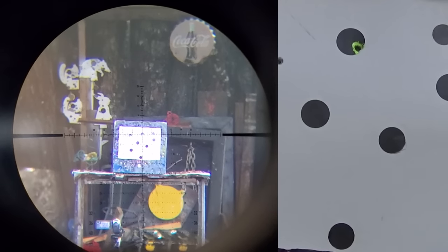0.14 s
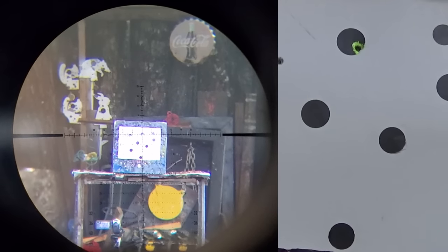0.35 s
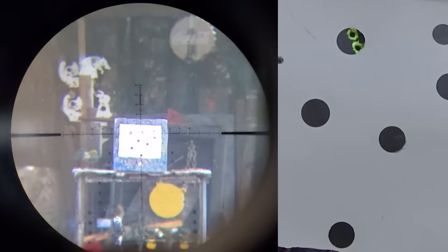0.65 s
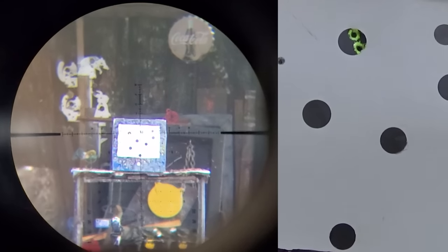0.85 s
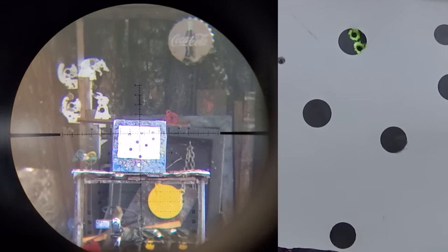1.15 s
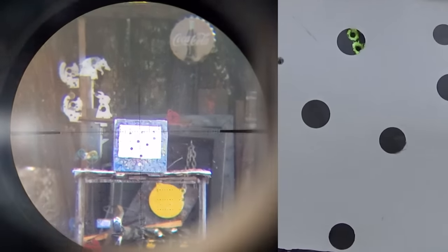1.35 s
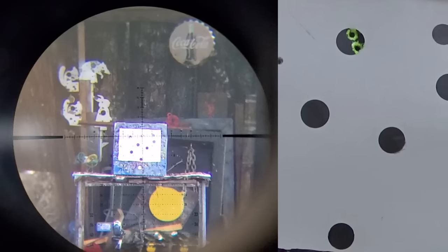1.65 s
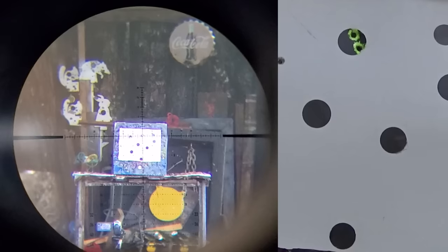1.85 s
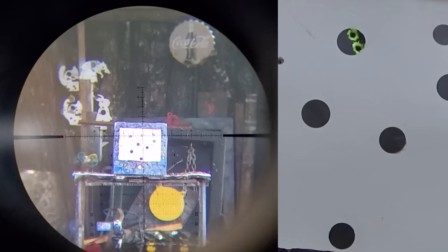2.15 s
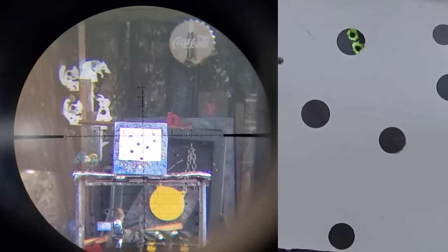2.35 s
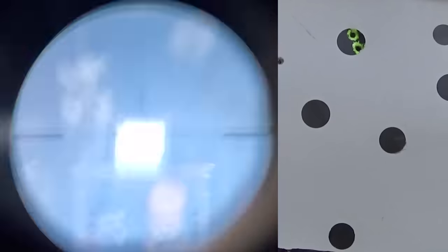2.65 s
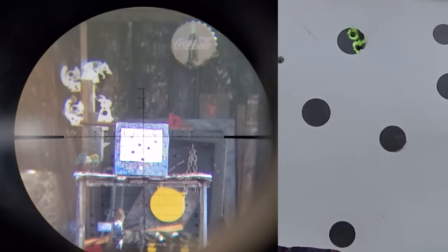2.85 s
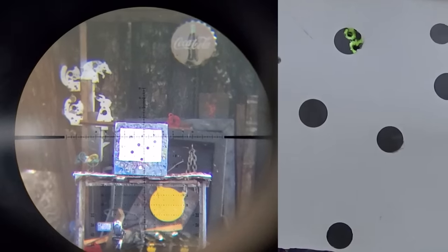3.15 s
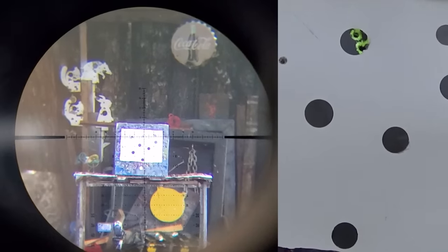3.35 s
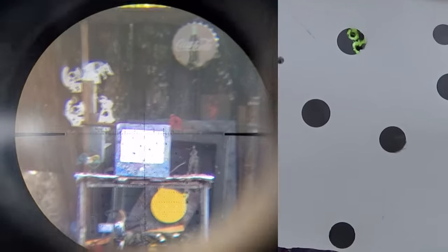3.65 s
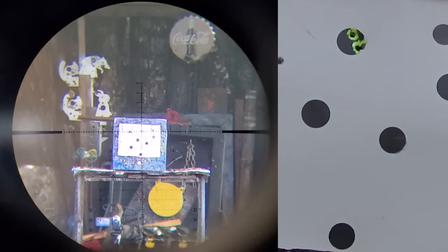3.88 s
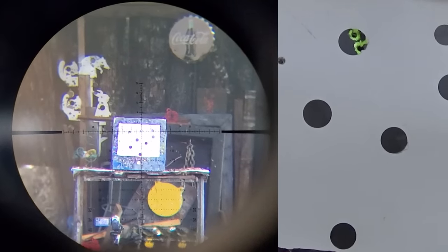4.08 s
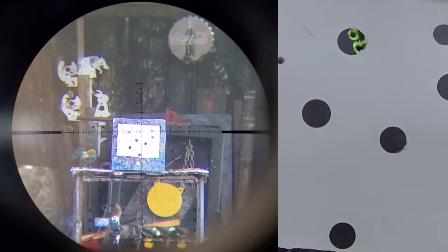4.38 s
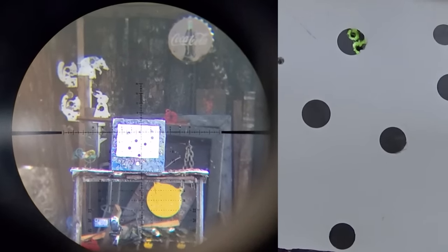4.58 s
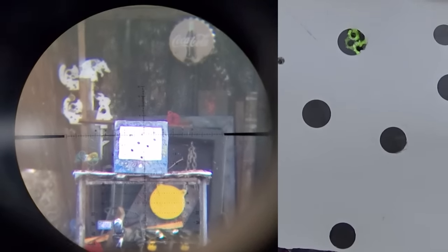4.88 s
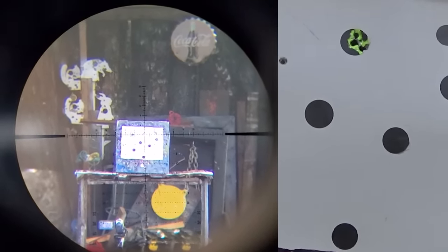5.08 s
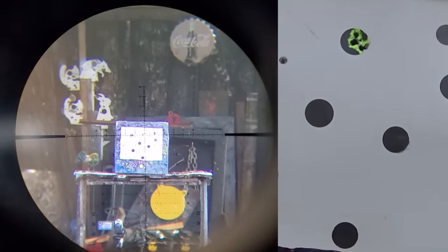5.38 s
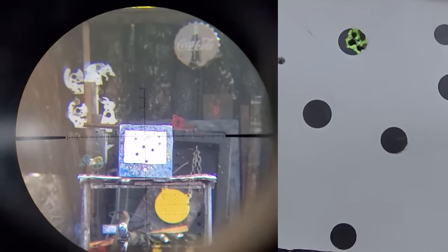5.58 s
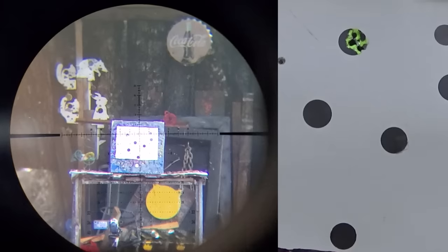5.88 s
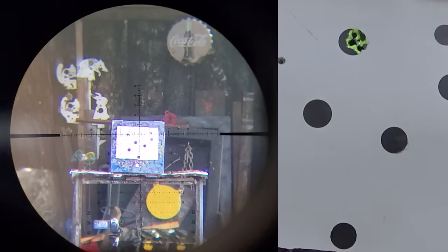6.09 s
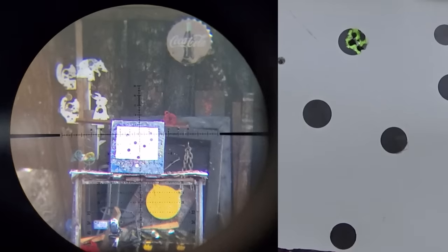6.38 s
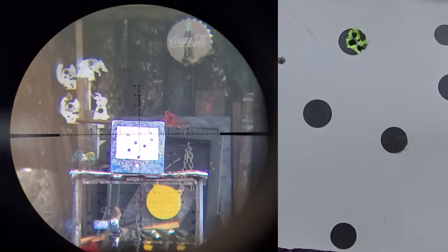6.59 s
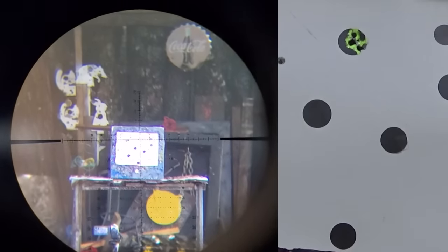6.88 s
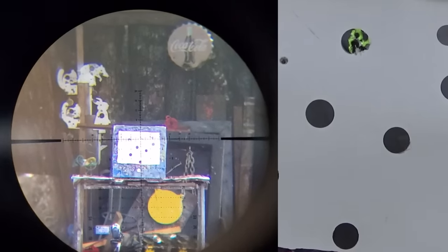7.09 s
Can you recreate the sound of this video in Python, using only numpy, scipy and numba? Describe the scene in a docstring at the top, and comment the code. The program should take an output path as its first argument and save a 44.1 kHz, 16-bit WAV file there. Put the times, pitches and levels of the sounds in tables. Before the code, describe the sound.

Four air rifle shots, heard from microphones at both the gun and the target trap. A low woody thump and breathy airy rush come first, a dry crack follows a moment later, then the pellet smashes into the trap and the yard rings with a hissy, grainy tail. Between shots are faint trigger clicks, rubbing of the stock, a tiny metal ping and soft outdoor rumble, with quiet bird chirps late on.

```python
"""An outdoor yard with a pellet trap: an air rifle fires about every two seconds, miked at the rifle and at the trap.
The rifle pair gets a hammer-and-air noise burst over decaying sine modes of stock, bottle and barrel.
The trap pair gets the ringing muzzle crack amid short noise bursts, then the pellet's smash and yard echo as
shaped noise, through a limiter. The echo of a shot before the start, handling noises, faint tones, a metal ping,
chirps of a bird and soft air lie under it."""
import sys
import numpy as np
from scipy import signal
from scipy.fft import rfft, irfft, next_fast_len
from scipy.io import wavfile
from scipy.ndimage import uniform_filter1d
from numba import njit

SR = 44100
rng = np.random.default_rng(int(sys.argv[2]) if len(sys.argv) > 2 else 0)


def persist_wave(psi):
    """Save psi, clipped to +-1, as 16-bit WAV."""
    counts = np.round(np.clip(psi, -1, 1) * 32767).astype(np.int16)
    wavfile.write(sys.argv[1], SR, np.atleast_2d(counts).T)


N = 318843  # length [samples]
DROP = np.log(1000)  # a 60 dB fall, as an exponent

# shots: (crack reaches trap [s], pellet hits [s], rifle [dB], body thump [dB], blow [dB], knock [dB])
SHOTS = [(-1.179, -1.07, -14, 0, -8, 0), (.5711, .680, -14, 0, -17.5, 8),
         (2.7796, 2.887, -13, -2, -12.5, 3), (4.8244, 4.931, -14, 0, -8.5, 0),
         (6.8528, 6.963, -14, -1, -7.5, -2)]
TRAP_M, SOUND_M_S = 46.5, 343  # rifle to trap [m], speed of sound [m/s]

# rush of hammer and air: (frequency [Hz], density [dB per Hz])
ACTION_COLOUR = [(60, -6), (130, 0), (400, -3), (750, 0), (1300, -6), (3000, -8), (6000, -9), (8300, -10),
                 (9100, -20), (10500, -12), (16000, -14)]
# how long the rush lasts: (frequency [Hz], t60 [s])
ACTION_T60 = [(200, .2), (800, .2), (3000, .3), (10000, .3)]
# resonances of the action: (frequency [Hz], width [Hz], boost [dB])
ACTION_BANDS = [(750, 250, 5), (2050, 200, 6), (2950, 250, 6), (3800, 300, 6), (5800, 400, 5),
                (8000, 700, 5)]
ACTION_RISE_S, ACTION_DB, ACTION_PAN_DB, VALVE_DB = .009, -9.5, -3, -4
# stock and bottle modes: (frequency [Hz], level [dB], left minus right [dB], right lag [turns],
# delay [s], swell [s], t60 [s])
BODY_MODES = [(35, -5, -4, .4, .01, .03, .25), (60, -5, -4, .35, .01, .03, .3),
              (88, -8, -3, .3, .02, .03, .3), (125, -8, -3, .4, .005, .01, .15),
              (165, -9, -5, .3, .005, .01, .15), (213, 27, -9, .2, .011, .06, .075),
              (255, 1, -6, .3, .004, .012, .1), (325, -9, -4, .3, 0, .006, .1),
              (215, -19, -9, .2, .02, .02, .3), (655, -7, -4, .3, 0, .004, .08),
              (780, -5, -4, .3, 0, .004, .06), (1001, -21, -6, .3, 0, .005, .5),
              (1222, -29, -4, .3, 0, .005, .8)]
# modes of thin steel parts: (frequency [Hz], level [dB], t60 [s])
BARREL_MODES = [(1437, -21, .16), (2012, -19, .2), (2440, -21, .18), (2765, -22, .22), (2970, -19, .17),
                (3695, -19, .2), (4150, -21, .22)]
BODY_TOP_HZ, RATTLE_DB = 400, 3.0  # modes below this make the thump; depth of every mode's waver
HAMMER_LEAD_S = .006  # the body is struck by the hammer just before the burst

# ring of the muzzle crack: (frequency [Hz], level [dB], t60 [s])
CRACK_MODES = [(2300, -2, .004), (2900, 2.5, .005), (3500, 5, .004), (4600, 3, .0035), (8200, -6, .003)]
# colour of the noise bursts around the crack: (frequency [Hz], density [dB per Hz])
REPORT_COLOUR = [(300, -20), (900, -17), (1500, -7), (2800, 0), (3600, -2), (5200, -7), (7400, -3),
                 (9700, -6), (12600, -15), (16000, -28)]
# noise bursts around the crack, two just before it and the rest after as returns off walls and ground:
# (offset [s], level [dB], t60 [s], resonance [Hz], resonance boost [dB])
REPORT_BURSTS = [(-.006, -19, .03, 3000, 0), (-.0028, -8, .008, 3600, 4), (.002, -13.5, .06, 2700, 4),
                 (.002, -23, 1.0, 3150, 6), (.013, -15, .04, 8000, 6), (.078, -12, .09, 2900, 11),
                 (.087, -14, .06, 11000, 12)]
# low knocks after the crack: (delay [s], frequency [Hz], level [dB], t60 [s])
THUDS = [(.002, 300, -22, .03), (.086, 220, -16, .025)]
REPORT_DB, HOLLOW_Q = -12, 7.  # report level at the trap; sharpness of the bursts' resonances

# colour of the pellet's smash: (frequency [Hz], density [dB per Hz])
SMASH_COLOUR = [(100, -40), (250, -23), (400, -28), (800, -15), (1400, -10.5), (2000, -8.5), (3000, -7),
                (6400, -6), (9300, -5), (11000, -10), (16000, -31)]
# resonances of the trap: (frequency [Hz], width [Hz], level [dB])
TRAP_MODES = [(1000, 80, 4), (1380, 50, 9), (1900, 60, 7), (2010, 50, 6), (4140, 60, 4), (4750, 90, 4),
              (6500, 200, 4), (7130, 60, 4)]
# colour of the knock of the trap's box: (frequency [Hz], density [dB per Hz])
KNOCK_COLOUR = [(150, -16), (300, -10), (480, -3), (700, -2), (1350, 1), (2000, -3), (3500, -30)]
# likeness of the trap pair's two sides: (frequency [Hz], likeness [0-1])
TRAP_LIKENESS = [(250, .94), (640, .8), (1400, .74), (3100, .68), (6800, .85), (15000, .93)]
# first returns of the impact: (delay [s], level [dB], t60 [s])
IMPACT_PATHS = [(.002, -2, .05), (.011, -1, .06), (.070, -4, .035), (.110, -16, .05)]
# decay of the yard's wash: (frequency [Hz], t60 [s])
YARD_T60 = [(200, 1.5), (450, .8), (800, 1.0), (1500, 1.1), (3700, .85), (7000, .65), (10000, .5),
            (15000, .33)]
# slaps off far walls: (delay [s], frequency [Hz], level re blow [dB], left minus right [dB])
SLAPS = [(.334, 1700, -13, -.5), (.416, 1800, -22, -2.5), (.622, 1950, -33, -1), (1.047, 1350, -39, -4)]
# colour of the late dull echo: (frequency [Hz], density [dB per Hz])
FAR_WOODS_COLOUR = [(300, -20), (700, -4), (1400, 0), (2200, -3), (4500, -14), (9000, -30)]
KNOCK_DB, KNOCK_T60_S = -11, .27
TRAP_RING_DB, TRAP_RING_T60_S, BLOW_RISE_S = -26, .6, .001
YARD_DB, GRAIN_DB, PATCH_DB = -7, 1.3, 1.6  # wash level, its graininess, its clumping in time and pitch
TRAP_IN_YARD = .75  # share of the trap's colour, in dB, kept in the echoes
FAR_DB, FAR_T60_S, TRAP_PAN_DB = -36, 3.0, -.8
LIMIT_DB, LIMIT_RATIO, LIMIT_ATTACK_S, LIMIT_RELEASE_S = -19, 6., .0016, .02

# short clicks, most of trigger parts and of hands on the rifle, two echoing off far walls: (time [s], level
# before pan [dB], frequency [Hz])
TICKS = [(1.1214, -41, 5500), (1.278, -44, 2200), (1.2915, -42, 1750), (1.3014, -47, 1600),
         (1.3783, -44, 1800), (3.5174, -45, 2500), (3.5523, -40, 2000), (3.5604, -42, 2200),
         (3.5927, -46, 2050), (3.6217, -50, 1880), (3.6681, -51, 2200), (5.6664, -44, 1860),
         (5.672, -46, 4500), (5.693, -43, 1420)]
TICK_T60_S, TICK_REACH, TICK_PAN_DB = .009, 2.2, -5.5  # reach: top of the click over its pitch
# grip shifts on the stock after a shot: (time [s], length [s], level before pan [dB])
GRIPS = [(1.316, .045, -52), (1.382, .025, -52), (3.596, .11, -56), (5.735, .06, -53)]
# what the rubbed stock passes on: (frequency [Hz], density [dB per Hz])
STOCK_COLOUR = [(115, -26), (230, 0), (320, -24), (900, -55)]
GRIP_JUDDER_DB, GRIP_PAN_DB, GRIP_T60_S = 2.5, -11.5, .05
SQUEAK_HZ, SQUEAK_DB, SQUEAK_LEAD_S, SQUEAK_S = 1460, -16, .005, .075  # lead: start before the rub ends
# faint rustles: (time [s], level [dB], frequency [Hz])
RUSTLES = [(1.64, -61, 1000), (2.475, -62, 700)]
RUSTLE_T60_S = .2
# soft low bumps: (time [s], level [dB], frequency [Hz], t60 [s])
BUMPS = [(.821, -27, 225, .04), (.945, -35, 250, .04)]
# a chip of metal lands: (frequency [Hz], level [dB], t60 [s])
PING_MODES = [(10150, -54, .12), (12200, -60, .01)]
PING_S = 3.401
# faint steady tones: (start [s], end [s], frequency [Hz], rms level [dB])
TONES = [(3.61, 3.79, 11300, -78), (-.1, .42, 172, -63), (2.3, 2.48, 380, -75)]
# bird: (time [s], level before pan [dB])
CHIRPS = [(6.197, -63), (6.255, -64), (6.33, -63), (6.42, -64)]
CHIRP_TOP_HZ, CHIRP_END_HZ, CHIRP_S, CHIRP_LOW_DB = 7600, 5300, .03, -15  # low: partial an octave down
# smear of the chirp by the leaves: (frequency [Hz], density [dB per Hz])
CHIRP_ECHO_COLOUR = [(4000, -25), (5300, -8), (6500, 0), (7400, 0), (8300, -25)]
CHIRP_ECHO_DB, CHIRP_ECHO_T60_S = 2.5, .65

# air common to both sides: (frequency [Hz], density [dB per Hz])
AIR_MID_COLOUR = [(12, -40), (25, -14), (50, -4), (85, 0), (125, -3), (200, -13), (400, -23), (1000, -25.5),
                  (2000, -31), (4000, -34), (8000, -36.5), (13000, -39), (16000, -45)]
# air opposed between the sides: (frequency [Hz], density [dB per Hz])
AIR_SIDE_COLOUR = [(12, -44), (20, -14), (77, 1), (163, -7), (210, -2), (923, -12), (1330, -17),
                   (2020, -18), (7950, -29), (16000, -51)]
AIR_DB, AIR_SIDE_DB = -59, -68
CLIP_DB, TOP_HZ = -9.5, 15900  # recorder's ceiling and treble cutoff


def undb(db):
    """Amplitude factor of a level in dB."""
    return 10 ** (np.asarray(db) / 20)


def read(table, hz):
    """Table value at a frequency, straight on a log axis."""
    table = np.array(table)
    return np.interp(np.log(hz), np.log(table[:, 0]), table[:, 1])


def add(out, s, x):
    """Mix x into out from time s, trimmed to the scene."""
    i = int(round(s * SR))
    a, b = max(i, 0), min(i + x.shape[-1], N)
    if b > a:
        out[:, a:b] += x[..., a - i:b - i]


def pan(db):
    """Left and right gains, db apart."""
    return undb(np.array([[db], [-db]]) / 2)


def walk(rate, size=N):
    """Random levels held 1 / rate s and slewed; spread near 1."""
    k = int(SR / rate)
    held = rng.standard_normal(size)[np.arange(size) // k]
    return 1.2 * uniform_filter1d(held, k)


def fade_by_pitch(both, t60, patch_db, size):
    """Decay in short frames, each band at its own rate, with random clumps of level."""
    hz, s, frames = signal.stft(both, SR, nperseg=256)
    clumps = rng.standard_normal(frames.shape[1:])
    clumps = uniform_filter1d(uniform_filter1d(clumps, size=3, axis=0), size=5, axis=1)
    frames = frames * undb(patch_db * clumps / clumps.std())
    frames = frames * np.exp(-DROP * s / read(t60, hz + 1)[:, None])
    return signal.istft(frames, SR, nperseg=256)[1][:, :size]


def wash(colour, t60, like, peaks=(), rise=.0002, size=0, patch_db=0.):
    """Coloured stereo noise, rms 1 with its peaks, before swell and decay; t60 and likeness are a value or a
    table."""
    hz = np.maximum(np.arange(size // 2 + 1) * SR / size, 1)
    gain = undb(read(colour, hz))
    for f, width, db in peaks:
        gain = gain * (1 + (undb(db) - 1) / (1 + (2 * (hz - f) / width) ** 2))
    like = np.clip(read(like, hz) if np.ndim(like) else like, 0, 1)
    mid, side = rfft(rng.standard_normal((2, size))) * gain / np.sqrt(np.mean(gain ** 2))
    shared, opposed = np.sqrt(1 + like) * mid, np.sqrt(1 - like) * side
    both = irfft(np.array([shared + opposed, shared - opposed]) / np.sqrt(2))
    t = np.arange(size) / SR
    if np.ndim(t60) == 0:
        both = both * np.exp(-DROP * t / t60)
    else:
        both = fade_by_pitch(both, t60, patch_db, size)
    return both * (1 - np.exp(-t / rise))


def ring(hz, t60, swell=.0003, lag=0.):
    """One decaying sine mode on both channels, with chance phase and a slightly new pitch."""
    t = np.arange(int(t60 * SR) + 64) / SR
    pitch = hz * (1 + .006 * rng.standard_normal())
    phase = pitch * t + rng.random() - np.array([[0], [lag]])  # [turns]
    envelope = (1 - np.exp(-t / swell)) ** 2 * np.exp(-DROP * t / t60)
    return np.sin(2 * np.pi * phase) * envelope


def tick(hz, t60, wide):
    """A short click with peak 1: noise gathered around one pitch."""
    colour = [(hz / 3, -30), (hz, 0), (hz * wide, -10), (hz * wide * 2, -40)]
    click = wash(colour, t60, .8, rise=.0006, size=1024)
    return click / np.abs(click).max()


def action(out, s, db):
    """Noise grows as the hammer rattles up to the valve, then air bursts out in a fluttering rush."""
    lead = 2048
    run_up = wash(ACTION_COLOUR, np.inf, 0., ACTION_BANDS, size=lead)
    run_up = run_up * np.exp((np.arange(lead) - lead) / SR / ACTION_RISE_S)
    add(out, s - lead / SR, run_up * undb(db + ACTION_DB) * pan(ACTION_PAN_DB))
    rush = wash(ACTION_COLOUR, ACTION_T60, 0., ACTION_BANDS, size=16384, patch_db=3.0)
    rush = rush * undb(.8 * walk(200, size=16384))
    add(out, s, rush * undb(db + ACTION_DB) * pan(ACTION_PAN_DB))
    valve = wash(ACTION_COLOUR, .04, 0., size=2048)
    add(out, s - .002, valve * undb(db + VALVE_DB))


def rifle_body(out, s, db, thump_db):
    """The hammer blow rings stock, bottle and thin steel in wavering modes, unlike on the two sides."""
    steel = [(hz, mode_db, 0, .2, 0, .004, t60) for hz, mode_db, t60 in BARREL_MODES]
    for hz, mode_db, pan_db, lag, delay, swell, t60 in BODY_MODES + steel:
        tone = ring(hz, t60, swell, lag + .05 * rng.standard_normal())
        waver = np.array([walk(70, size=32768), walk(70, size=32768)])
        k = min(tone.shape[1], waver.shape[1])
        level_db = db + mode_db + thump_db * (hz < BODY_TOP_HZ)
        gain = undb(level_db + RATTLE_DB * waver[:, :k]) * pan(pan_db)
        add(out, s - HAMMER_LEAD_S + delay, tone[:, :k] * gain)


def rifle():
    """Action and body at the rifle pair, ahead of the crack at the trap by the sound's travel time."""
    out = np.zeros((2, N))
    for crack_s, _, db, thump_db, _, _ in SHOTS:
        s = crack_s - TRAP_M / SOUND_M_S
        action(out, s, db)
        rifle_body(out, s, db, thump_db)
    return out


def report():
    """The muzzle report at the trap: a short ringing crack, noise bursts just before and after it, low knocks."""
    out = np.zeros((2, N))
    for s, *_ in SHOTS:
        for hz, mode_db, t60 in CRACK_MODES:
            add(out, s + .0006, ring(hz, t60) * undb(REPORT_DB + mode_db) * pan(-3.))
        for offset, burst_db, t60, hz, hollow_db in REPORT_BURSTS:
            hollow = [(hz * (1 + .04 * rng.standard_normal()), hz / HOLLOW_Q, hollow_db)]
            rise = .001 + .03 * max(offset, 0)  # later bursts swell more slowly
            burst = wash(REPORT_COLOUR, t60, TRAP_LIKENESS, hollow, rise=rise, size=8192)
            add(out, s + offset, burst * undb(REPORT_DB + burst_db) * pan(-2.))
        for delay, hz, thud_db, t60 in THUDS:
            add(out, s + delay, ring(hz, t60, .003) * undb(REPORT_DB + thud_db))
    return out


def trap_blow(out, s, db, knock_db, grain):
    """The pellet smashes as coloured noise, knocks the trap's box and leaves its plates singing."""
    for hz, _, mode_db in TRAP_MODES:
        tone = ring(hz, TRAP_RING_T60_S, .004, .05)
        waver_db = 3.0 * walk(60, size=32768)[:tone.shape[1]]
        add(out, s, tone * undb(db + TRAP_RING_DB + mode_db + waver_db))
    knock = wash(KNOCK_COLOUR, KNOCK_T60_S, .85, TRAP_MODES, .003, size=16384)
    add(out, s + .002, knock * undb(db + KNOCK_DB + knock_db))
    for delay, path_db, t60 in IMPACT_PATHS:
        smash = wash(SMASH_COLOUR, t60, .9, TRAP_MODES, BLOW_RISE_S, size=4096)
        add(out, s + delay, smash * grain[:4096] * undb(db + path_db))


def yard_echo(out, s, db, grain):
    """The yard answers with a grainy wash, slaps from far walls and a dull late echo."""
    size = len(grain)
    blurred = [(hz, width, TRAP_IN_YARD * mode_db) for hz, width, mode_db in TRAP_MODES]
    yard = wash(SMASH_COLOUR, YARD_T60, TRAP_LIKENESS, blurred, BLOW_RISE_S, size=size, patch_db=PATCH_DB)
    add(out, s, yard * grain * undb(db + YARD_DB))
    far = wash(FAR_WOODS_COLOUR, FAR_T60_S, .2, blurred, size=2 * size)
    add(out, s, far * undb(db + FAR_DB))
    for delay, hz, slap_db, pan_db in SLAPS:
        add(out, s + delay, tick(hz, .014, 1.9) * undb(db + slap_db) * pan(pan_db))


def impact():
    """Each pellet's blow on the trap and its echo, sharing one random grain of level."""
    out = np.zeros((2, N))
    for _, s, _, _, db, knock_db in SHOTS:
        grain = undb(GRAIN_DB * walk(900, size=65536))
        trap_blow(out, s, db, knock_db, grain)
        yard_echo(out, s, db, grain)
    return out * pan(TRAP_PAN_DB)


@njit
def limit(x, top, slope, attack, release):
    """Limiter gain: a smoothed level rises and falls at its own rates, and its excess is pressed down."""
    gain, level = np.empty(len(x)), 0.
    for i in range(len(x)):
        level += (x[i] - level) * (attack if x[i] > level else release)
        gain[i] = min(1., top / (level + 1e-9)) ** slope
    return gain


def trap_pair():
    """Report and impact through one limiter that follows the louder channel."""
    trap = report() + impact()
    louder = np.abs(trap).max(axis=0)
    attack, release = 1 / (LIMIT_ATTACK_S * SR), 1 / (LIMIT_RELEASE_S * SR)
    return trap * limit(louder, undb(LIMIT_DB), 1 - 1 / LIMIT_RATIO, attack, release)


def grip(length):
    """A hand judders along the stock, which hums low and lets out a thin wavering ring at the end."""
    t = np.arange(8192) / SR
    judder = undb(GRIP_JUDDER_DB * walk(45, size=len(t)))
    rub = wash(STOCK_COLOUR, np.inf, .9, rise=.004, size=len(t)) * judder
    rub = rub / np.sqrt(np.mean(rub[:, t < length] ** 2))
    rub = rub * np.exp(-DROP * np.maximum(t - length, 0) / GRIP_T60_S)
    along = np.clip((t - length + SQUEAK_LEAD_S) / SQUEAK_S, 0, 1)
    squeak = np.sin(2 * np.pi * SQUEAK_HZ * t) * np.sin(np.pi * along) * judder
    return rub + squeak * undb(SQUEAK_DB)


def handling():
    """Noise clicks, grip shifts and rustles, with soft bumps as low decaying sines."""
    out = np.zeros((2, N))
    for s, db, hz in TICKS:
        add(out, s, tick(hz, TICK_T60_S, TICK_REACH) * undb(db) * pan(TICK_PAN_DB))
    for s, length, db in GRIPS:
        add(out, s, grip(length) * undb(db) * pan(GRIP_PAN_DB))
    for s, db, hz in RUSTLES:
        colour = [(hz / 3, -20), (hz, 0), (hz * 2, -6), (hz * 4, -30)]
        add(out, s, wash(colour, RUSTLE_T60_S, .5, rise=.005, size=8192) * undb(db))
    for s, db, hz, t60 in BUMPS:
        add(out, s, ring(hz, t60, .003) * undb(db))
    return out


def metal_ping():
    """A chip of metal lands and rings in high decaying modes."""
    out = np.zeros((2, N))
    for hz, db, t60 in PING_MODES:
        add(out, PING_S, ring(hz, t60) * undb(db))
    return out


def bird():
    """Falling chirps with a partial an octave down, each smeared by the leaves into decaying noise."""
    out = np.zeros((2, N))
    t = np.arange(int(CHIRP_S * SR)) / SR
    high = signal.chirp(t, CHIRP_TOP_HZ, CHIRP_S, CHIRP_END_HZ)
    low = signal.chirp(t, CHIRP_TOP_HZ / 2, CHIRP_S, CHIRP_END_HZ / 2)
    call = (high + undb(CHIRP_LOW_DB) * low) * np.hanning(len(t))
    for s, db in CHIRPS:
        add(out, s, call * undb(db) * pan(3.))
        smear = wash(CHIRP_ECHO_COLOUR, CHIRP_ECHO_T60_S, .3, rise=.005, size=32768)
        add(out, s, smear * undb(db + CHIRP_ECHO_DB))
    return out


def faint_tones():
    """Steady sines with softened ends."""
    out = np.zeros((2, N))
    for start, end, hz, db in TONES:
        t = np.arange(int((end - start) * SR)) / SR
        tone = np.sqrt(2) * undb(db) * np.sin(2 * np.pi * hz * t)
        add(out, start, tone * signal.windows.tukey(len(t), .2))
    return out


def air():
    """Distant rumble and hiss as steady coloured noise; the rumble swells slowly."""
    size = next_fast_len(N + N % 2, True)
    mid = wash(AIR_MID_COLOUR, np.inf, 1., size=size)[:, :N] * undb(AIR_DB)
    rumble = signal.sosfilt(signal.butter(2, 300, fs=SR, output="sos"), mid)
    swell = undb(1.5 * walk(2.5)) - 1
    side = wash(AIR_SIDE_COLOUR, np.inf, 1., size=size)[0, :N] * undb(AIR_SIDE_DB)
    return mid + rumble * swell + side * np.array([[1], [-1]])


def scene():
    """Both microphone pairs mixed, over the small sounds and the air."""
    small_sounds = handling() + metal_ping() + bird() + faint_tones()
    return rifle() + trap_pair() + small_sounds + air()


def record(dry):
    """The recorder rounds off the sharpest peaks and cuts the top steeply."""
    rounded = undb(CLIP_DB) * np.tanh(dry / undb(CLIP_DB))
    return signal.sosfilt(signal.ellip(12, .2, 80, TOP_HZ, fs=SR, output="sos"), rounded)


dry = scene()
out = record(dry)
persist_wave(out)
```